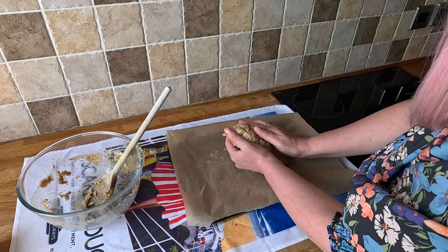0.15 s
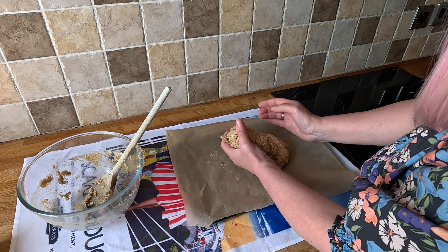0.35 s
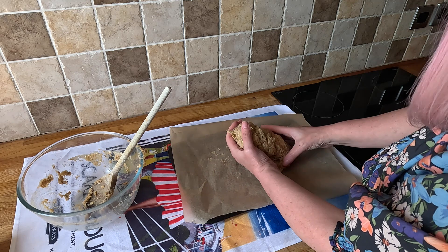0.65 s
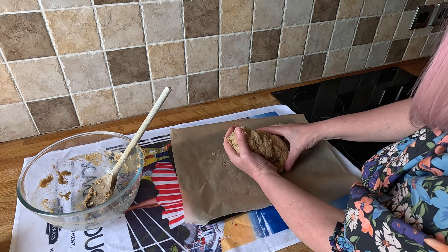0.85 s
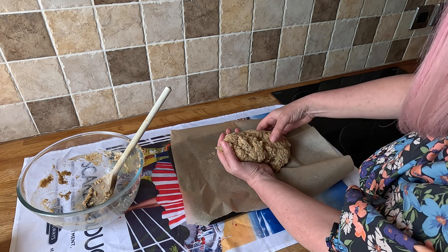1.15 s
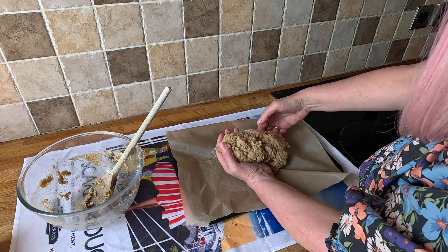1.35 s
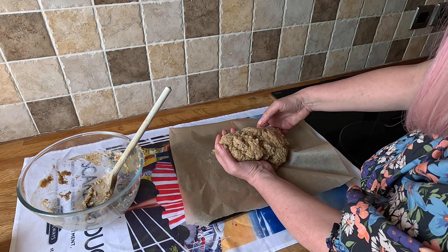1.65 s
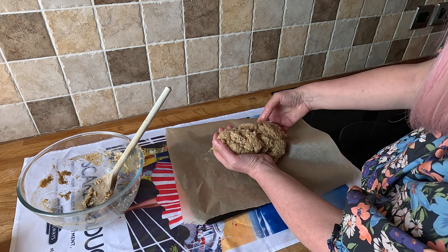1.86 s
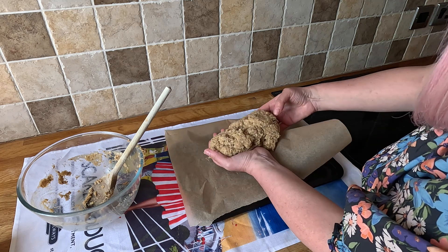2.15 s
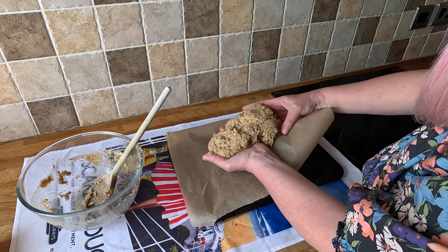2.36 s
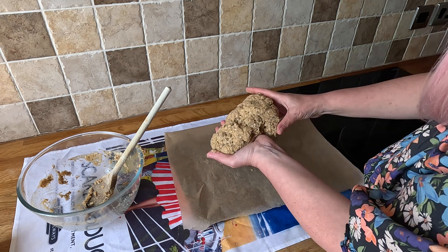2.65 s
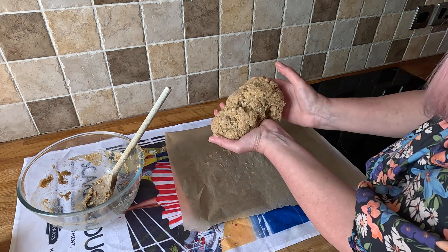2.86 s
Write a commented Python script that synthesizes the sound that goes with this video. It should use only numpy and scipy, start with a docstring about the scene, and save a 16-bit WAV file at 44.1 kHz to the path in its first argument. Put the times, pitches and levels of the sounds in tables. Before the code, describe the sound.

Baking paper rustles and crackles as it is dragged and lifted, following one pat on dough.

```python
"""A palm pats dough once, a wet slap and a hollow thump, over a low appliance hum.
The baking paper under the dough is then dragged and lifted with it, and settles back:
the sheet crackles and rubs, its creases buckle and snap.
Counter and tiles of the kitchen reflect pat and paper."""
import sys
import numpy as np
from scipy import signal
from scipy.fft import rfft, irfft
from scipy.io import wavfile

SR = 44100
rng = np.random.default_rng(int(sys.argv[2]) if len(sys.argv) > 2 else 0)


def store_pcm(level_fs):
    """Save levels as 16-bit WAV."""
    pcm = np.round(np.clip(level_fs, -1, 1) * 32767).astype(np.int16)
    wavfile.write(sys.argv[1], SR, np.atleast_2d(pcm).T)


N = 132300
T = np.arange(N) / SR
HZ = np.fft.rfftfreq(4096, 1 / SR)

# hum overtones: harmonic number, level/dB
HUM_OVERTONES = [(2, -70.5), (4, -68.5)]
# room air spectrum: f/Hz, relative density/dB
AIR_SPECTRUM = [(20, 1), (32, -2), (70, -2.5), (130, -4), (250, -10), (400, -19.5), (800, -26.5),
                (1300, -25.5), (2500, -34.5), (4000, -37), (6500, -31.5), (10000, -40), (15000, -50)]
# reverberation time: f/Hz, T60/s
KITCHEN_T60 = [(200, 0.25), (1400, 0.37), (4000, 0.31), (12000, .38)]
# stereo width of reflections and air: f/Hz, side gain
SIDE_GAIN = [(100, 0.12), (500, 0.41), (1200, .53), (2500, .7), (7000, 0.49), (13000, 0.61)]
# wet slap spectrum: f/Hz, relative density/dB
SLAP_SPECTRUM = [(300, 5), (1000, -3), (1800, -4), (3200, 4), (4500, -4), (8000, -10), (11000, -21),
                 (15000, -42)]
# hollow thump spectrum: f/Hz, relative density/dB
THUMP_SPECTRUM = [(90, -37), (150, -1), (220, 7.5), (350, 2), (450, 1), (600, 6.5), (770, 0.5), (860, -38),
                  (1200, -20), (1500, 0), (1900, -12), (3000, -42)]
# paper spectrum: f/Hz, relative density/dB
PAPER_SPECTRUM = [(200, -19), (320, -9), (430, -11), (680, -7.5), (1000, -6.5), (1700, -1.5), (2400, 0),
                  (3200, 0), (4100, -4), (6800, -7.5), (8350, -16.5), (10400, -19.5), (12500, -29.5),
                  (15500, -42.5)]
# how hard the paper is moved: t/s, level/dB
PAPER_MOTION = [(0.2, -82), (0.25, -50), (0.33, -50), (0.42, -54.5), (0.5, -60.5), (0.575, -53.5),
                (0.605, -40.5), (0.66, -39), (0.725, -29), (0.77, -37), (0.83, -39.5), (0.92, -43),
                (0.95, -40), (1.0, -34.5), (1.2, -38), (1.32, -32.5), (1.43, -37.5), (1.53, -47),
                (1.575, -46.5), (1.6, -37), (1.68, -44.5), (1.75, -37.5), (1.8, -42), (1.86, -34.5),
                (1.91, -43.5), (1.98, -35), (2.07, -40), (2.22, -52.5), (2.33, -48), (2.44, -43),
                (2.5, -40), (2.59, -50), (2.65, -41), (2.695, -44), (2.73, -38), (2.765, -50.5),
                (2.82, -50.5), (3.0, -55)]
# rustle tone: t/s, bass shelf/dB, treble shelf/dB
RUSTLE_SHELVES = [(0.3, -2, 1.5), (0.62, -10, -2.5), (0.76, 2.5, 0.5), (0.9, 5.5, -3.5), (1.1, 7.5, 5),
                  (1.35, 2, 3), (1.55, 8.5, 6.5), (1.83, -4.5, -2), (2.05, 10, 5), (2.25, 13, 3.5),
                  (2.45, 7, -1.5), (2.61, -0.5, 0), (2.7, -1, -4.5), (2.85, -29, -10)]
# buckling creases: t/s, relative level/dB, decay/s, brightness/dB (treble up, bass down)
CREASE_SNAPS = [(0.2205, -51.5, 0.0056, 7), (0.41, -40.5, 0.0031, -18.5), (0.437, -46.5, 0.0048, 6.5),
                (0.556, -43, 0.0047, -11.5), (0.584, -34.5, .005, -4), (0.597, -38.5, 0.004, 17),
                (0.676, -42, .002, 21), (0.791, -27, 0.01, 2.5), (0.9663, -29, 0.0014, 11),
                (1.004, -21, 0.0019, 0), (1.096, -26, 0.0018, 5), (1.107, -22.5, .005, 4),
                (1.171, -20.5, .002, 2), (1.178, -24.5, 0.0027, 5), (1.193, -18.5, 0.0039, -1.5),
                (1.219, -25.5, 0.0027, -10.5), (1.2671, -20.5, 0.0032, 2.5), (1.2968, -16, 0.0038, 0),
                (1.3118, -22, .003, 1), (1.346, -33, .001, 11), (1.3933, -23.5, 0.0015, 18),
                (1.459, -30.5, 0.0038, 3), (1.552, -25, 0.0012, 2), (1.5839, -24, 0.0045, 4),
                (1.605, -23.5, 0.0038, -4), (1.656, -30, 0.0087, 4.5), (1.6886, -22.5, 0.0023, -5.5),
                (1.7143, -26.5, 0.0034, 14), (1.8573, -32, 0.003, -4), (1.88, -33, 0.0019, -5),
                (1.9222, -19, 0.00089, -3.5), (1.976, -26, 0.0028, 3.5), (2.016, -28, 0.0051, 1),
                (2.045, -37.5, 0.007, 11.5), (2.048, -22, 0.0075, 5.5), (2.059, -33, 0.0061, 10),
                (2.129, -28.5, 0.0028, 12.5), (2.137, -27.5, 0.0029, 8), (2.2963, -24, 0.0012, -12),
                (2.353, -32, 0.0018, -10), (2.408, -27, .006, -6), (2.4223, -22.5, 0.0022, 0.5),
                (2.4696, -22, 0.0014, 8.5), (2.771, -33.5, 0.0025, -12), (2.834, -41.5, 0.0046, -1),
                (2.899, -34.5, 0.0019, -3.5)]

HUM_HZ, HUM_DB, WAVER_HZ, WAVER_DEPTH = 49.8, -42, 18, 0.11
AIR_DB = -55.5
TAIL_DB, EARLY_DB, EARLY_DECAY_S = -3.5, -5.5, 0.012
PAT_S, SLAP_DB, SLAP_DECAY_S, THUMP_DB, THUMP_DECAY_S = 0.2636, -20, 0.0025, -31, 0.013
CRACKLES_PER_S, CRACKLE_DB, RUB_DB = 2400, -6, -6.5
CLUMPS_PER_S, CLUMP_DECAY_S, CLUMP_DB = 130, 0.00098, -5
FLUTTER_HZ, FLUTTER_DB = 46, 1.0
SNAP_GAIN_DB, SNAP_BASS_DB = 3, -7
PATCH_RANGE_HZ, PATCH_PEAK_DB, PATCH_WIDTH_OCT = (1310, 8800), 4, 0.52
LOW_CUT_HZ, BASS_HZ, TREBLE_HZ = 93, 1110, 5700


def amp(db):
    """dB to gain."""
    return 10 ** (np.asarray(db) / 20)


def unit(x):
    """Scale to rms 1."""
    return x / np.sqrt(np.mean(x ** 2) + 1e-20)


def read(table, hz):
    """Interpolate over log frequency."""
    table_hz, value = np.transpose(table)
    return np.interp(np.log(hz + 1), np.log(table_hz + 1), value)


def response(spectrum):
    """dB table to gains at HZ, rms 1."""
    return unit(amp(read(spectrum, HZ)))


def colour(x, gain):
    """Minimum-phase filter from gains at HZ."""
    log_gain = np.log(np.maximum(gain, gain.max() * 1e-5))
    log_response = np.conj(signal.hilbert(np.r_[log_gain, log_gain[-2:0:-1]]))
    taps = irfft(np.exp(log_response)[:len(HZ)])
    return signal.oaconvolve(x, taps if x.ndim == 1 else taps[None], axes=-1)[..., :N]


def shelf(x, gain_db, hz, kind):
    """Low or high shelf."""
    band = signal.sosfiltfilt(signal.butter(1, hz, kind, fs=SR, output="sos"), x)
    return x + (amp(gain_db) - 1) * band


def drift(hz):
    """Random motion below hz, rms 1."""
    rolloff = 1 + (np.fft.rfftfreq(N, 1 / SR) / hz) ** 4
    return unit(irfft(rfft(rng.standard_normal(N)) / rolloff, N))


def add(mix, start_s, sound):
    """Mix in place at start_s."""
    part = mix[round(start_s * SR):][:len(sound)]
    part += sound[:len(part)]


def ticks(per_s, spread_db=2.5):
    """Sparse clicks, large ones rare."""
    chance = rng.random(N) * SR / per_s
    hit = chance < 1
    clicks = np.zeros(N)
    clicks[hit] = amp(spread_db * np.minimum(-np.log(chance[hit]), 3.5))
    return clicks


def burst(decay_s, rise_ratio=0.28, clicks_per_s=14000, samples=4096):
    """Avalanche of tiny clicks: quick swell, exponential decay."""
    age = T[:samples] / decay_s
    envelope = (1 - np.exp(-age / rise_ratio)) * np.exp(-age)
    clicks = rng.standard_normal(samples) * (rng.random(samples) < clicks_per_s / SR) * envelope
    return clicks * np.linalg.norm(envelope) / (np.linalg.norm(clicks) + 1e-12)


def room_air():
    """Faint steady noise; left, right."""
    mid, side = colour(rng.standard_normal((2, N)), response(AIR_SPECTRUM))
    side = colour(side, read(SIDE_GAIN, HZ))
    return amp(AIR_DB) * np.array([mid + side, mid - side])


def appliance_hum():
    """Fundamental wavering in level and phase, plus steady overtones."""
    phase = 2 * np.pi * HUM_HZ * T
    in_phase = (1 + WAVER_DEPTH * drift(WAVER_HZ)) * np.sin(phase)
    quadrature = WAVER_DEPTH * drift(WAVER_HZ) * np.cos(phase)
    overtones = sum(amp(db) * unit(np.sin(k * phase)) for k, db in HUM_OVERTONES)
    return amp(HUM_DB) * unit(in_phase + quadrature) + overtones


def kitchen(x):
    """Direct sound, early reflections off counter and tiles, diffuse tail; mid, side."""
    t = T[:SR // 2]
    hz, frame_s, noise = signal.stft(rng.standard_normal((2, len(t))), SR, nperseg=256)
    decay = amp(-60 * frame_s / read(KITCHEN_T60, hz)[:, None])
    tail = signal.istft(noise * decay, SR, nperseg=256)[1][:, :len(t)]
    tail *= 1 - np.exp(-t / 0.004)
    spikes = rng.choice([-1, 1], tail.shape) * (rng.random(tail.shape) < 0.08)
    early = spikes * np.exp(-t / EARLY_DECAY_S) * (t > 0.0006)
    echoes = sum(amp(db) * part / np.linalg.norm(part, axis=1, keepdims=True)
                 for db, part in [(TAIL_DB, tail), (EARLY_DB, early)])
    mid, side = signal.oaconvolve(x[None], echoes, axes=1)[:, :N]
    return amp(-1.5) * np.array([x + mid, side])


def palm_pat():
    """Palm lands on dough: short wet slap, longer hollow thump."""
    slap, thump = np.zeros((2, N))
    add(slap, PAT_S, amp(SLAP_DB) * burst(SLAP_DECAY_S))
    add(thump, PAT_S, amp(THUMP_DB) * burst(THUMP_DECAY_S))
    return colour(slap, response(SLAP_SPECTRUM)) + colour(thump, response(THUMP_SPECTRUM))


def rustle(share):
    """Crackles, crackle clumps and rubbing from a share of the sheet."""
    fibres = rng.standard_normal(N)
    crackles = unit(ticks(share * CRACKLES_PER_S) * np.sign(fibres))
    onsets = ticks(share * CLUMPS_PER_S) ** 0.5 + 1e-9
    pole = np.exp(-1 / (CLUMP_DECAY_S * SR))
    clumps = unit(signal.lfilter([1], [1, -pole], onsets) * fibres)
    rub = rng.standard_normal(N)
    return np.sqrt(share) * (amp(CRACKLE_DB) * crackles + amp(CLUMP_DB) * clumps + amp(RUB_DB) * rub)


def crease_snap(level_db, decay_s, bright_db):
    """A crease buckles: one click burst, tilted by brightness."""
    snap = amp(level_db + SNAP_GAIN_DB) * burst(decay_s)
    snap = shelf(snap, SNAP_BASS_DB - bright_db, BASS_HZ, "low")
    return shelf(snap, bright_db, TREBLE_HZ, "high")


def baking_paper(patches=5):
    """Patches of the sheet rustle and snap, each with its own rustle band and echoes; mid, side."""
    motion = amp(np.interp(T, *np.transpose(PAPER_MOTION)) + FLUTTER_DB * drift(FLUTTER_HZ))
    times_s, *shelves_db = np.transpose(RUSTLE_SHELVES)
    bass_db, treble_db = [np.interp(T, times_s, db) for db in shelves_db]
    sheet = np.zeros((2, N))
    for k, centre_hz in enumerate(np.geomspace(*PATCH_RANGE_HZ, patches)):
        band = np.exp(-(np.log2((HZ + 1) / centre_hz) / PATCH_WIDTH_OCT) ** 2)
        patch = colour(motion * rustle(1 / patches), amp(PATCH_PEAK_DB * (band - 1 / patches)))
        patch = shelf(patch, bass_db, BASS_HZ, "low")
        patch = shelf(patch, treble_db, TREBLE_HZ, "high")
        for start_s, level_db, decay_s, bright_db in CREASE_SNAPS[k::patches]:
            add(patch, start_s, crease_snap(level_db, decay_s, bright_db))
        sheet += kitchen(patch)
    low_cut = 1 / np.sqrt(1 + (LOW_CUT_HZ / (HZ + 1)) ** 4)
    return colour(sheet, unit(response(PAPER_SPECTRUM) * low_cut))


def scene(skew_samples=0.34):
    """Paper and pat in the kitchen, over hum and air; left, right."""
    mid, side = baking_paper() + kitchen(palm_pat())
    side = colour(side, read(SIDE_GAIN, HZ))
    side -= skew_samples * np.gradient(mid)  # left lags, right leads
    return np.array([mid + side, mid - side]) + appliance_hum() + room_air()


def record(dry, cutoff_hz=15750):
    """Steep linear-phase low-pass."""
    taps = signal.firwin(511, cutoff_hz, window=("kaiser", 9), fs=SR)
    return signal.oaconvolve(dry, taps[None], "same")


dry = scene()
out = record(dry)
store_pcm(out)
```